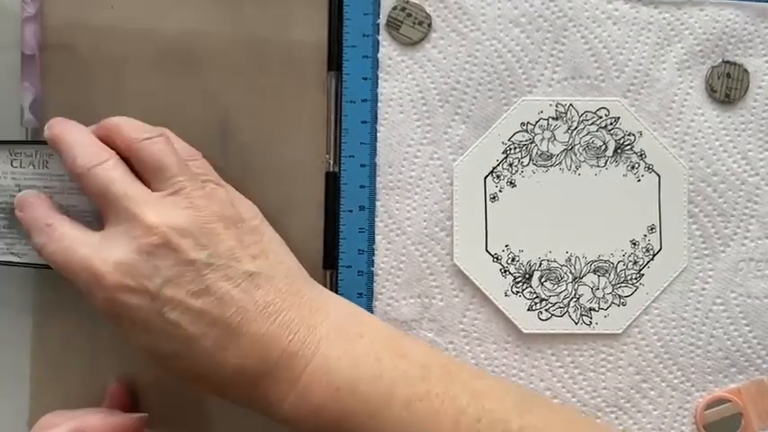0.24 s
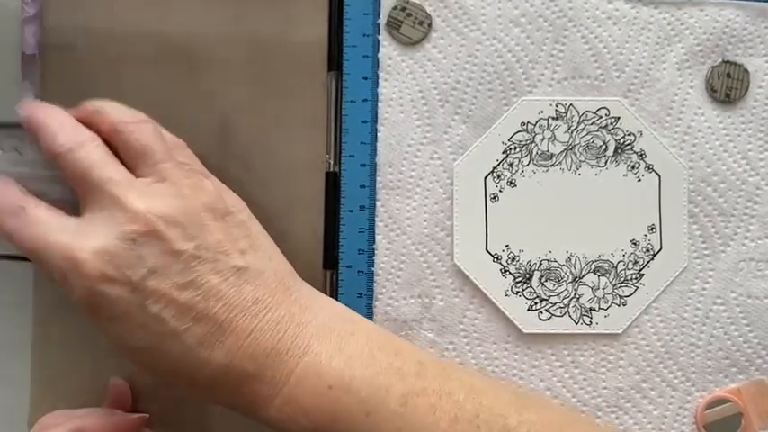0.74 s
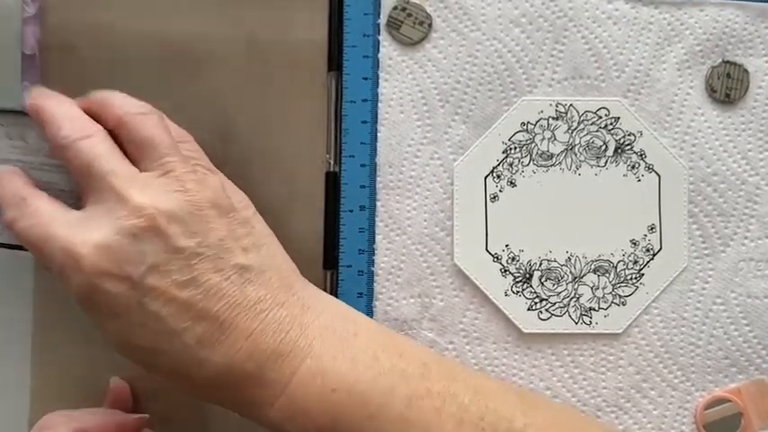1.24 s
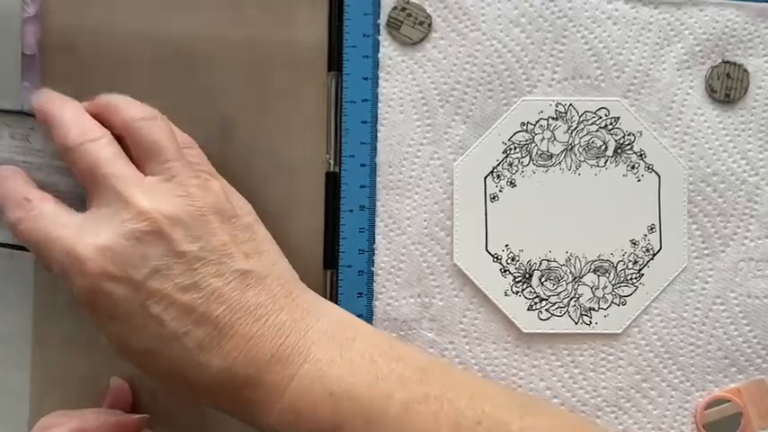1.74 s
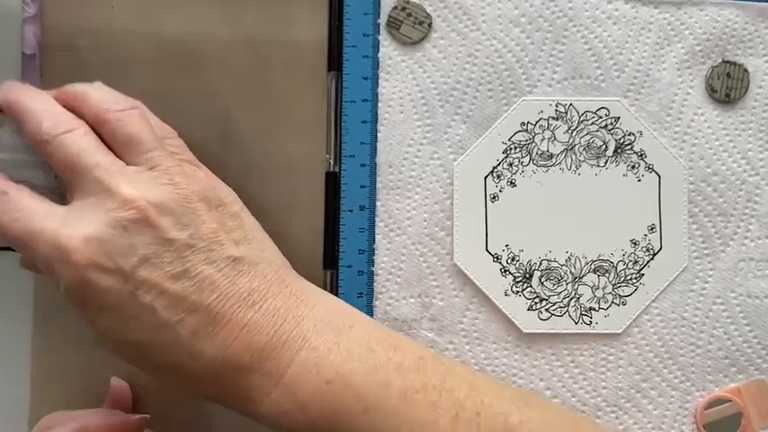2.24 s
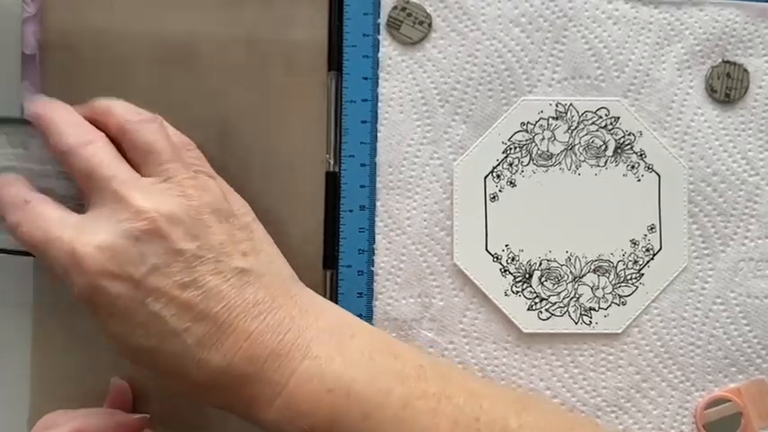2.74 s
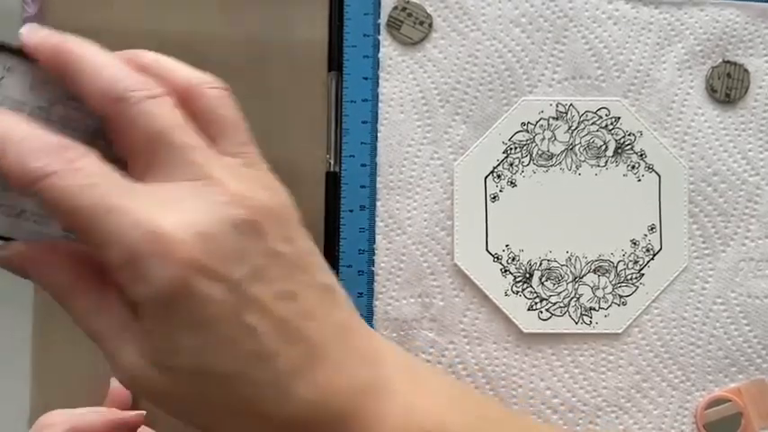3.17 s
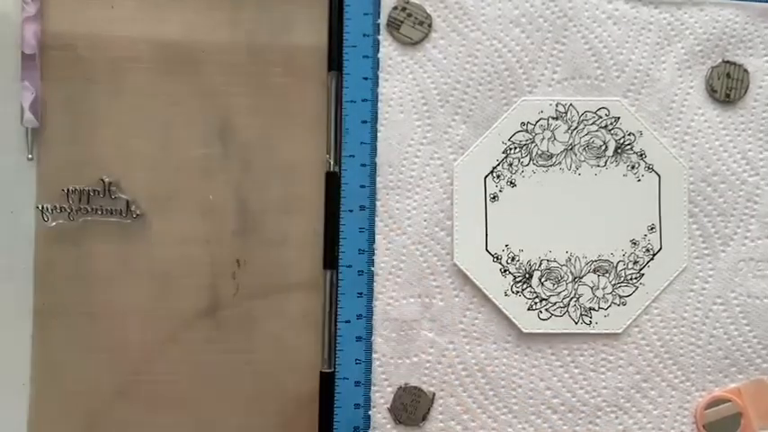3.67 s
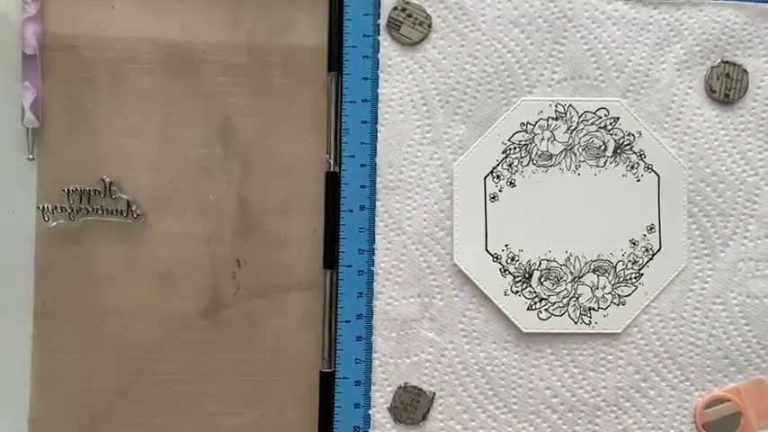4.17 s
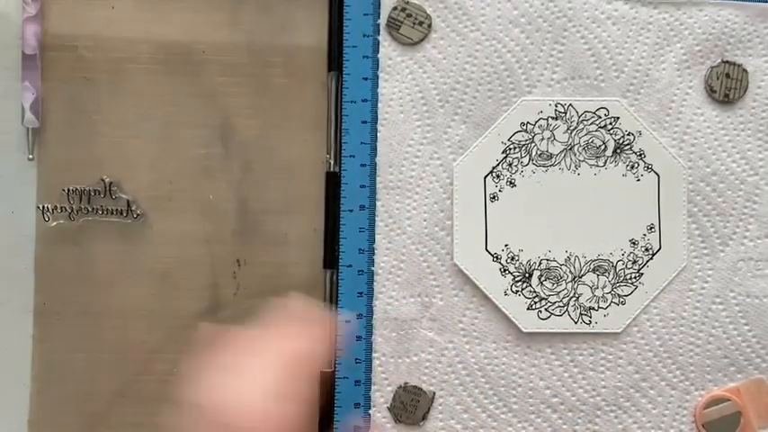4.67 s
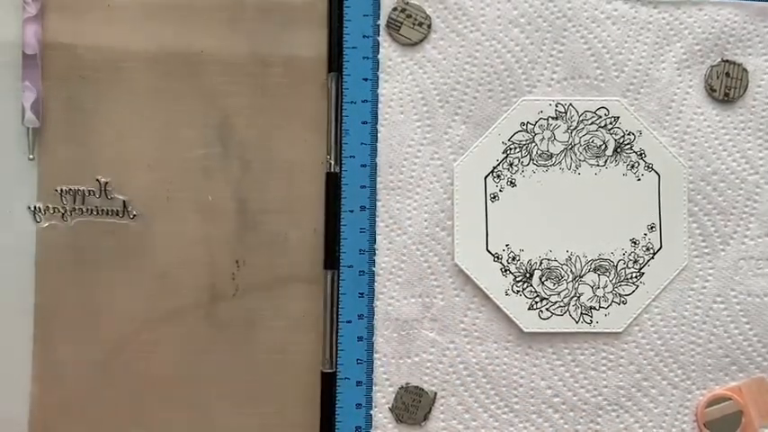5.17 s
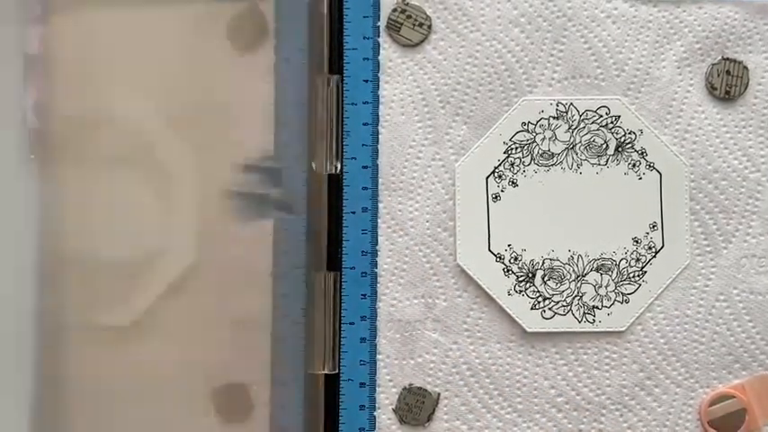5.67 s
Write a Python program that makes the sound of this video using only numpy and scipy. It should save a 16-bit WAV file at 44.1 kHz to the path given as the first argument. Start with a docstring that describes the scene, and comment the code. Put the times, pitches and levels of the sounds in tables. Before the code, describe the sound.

Soft paired taps on a desk and light plastic snaps, followed by two loud thunks and a brief shudder from a stamp press.

```python
"""An ink pad is tapped in six pairs on a rubber stamp, on a desk in a small room.
Its plastic lid is snapped on and it is put down. Then the hinged plate of a stamp press is lifted
with two loud thunks, and shudders and groans as it swings over. Blows reach the microphone as
dispersive bending waves in the desk, treble first and bass last. Fingers brush over plastic;
a faint drone swells twice at the start, over the hush of the room."""
import sys
import numpy as np
from scipy import signal
from scipy.fft import rfft, irfft
from scipy.io import wavfile
from scipy.ndimage import uniform_filter1d

SR = 44100
rng = np.random.default_rng(int(sys.argv[2]) if len(sys.argv) > 2 else 0)


def dump(signal):
    """Clip the signal to [-1, 1] and save it as 16-bit WAV at the path in sys.argv[1]."""
    limited = np.clip(np.atleast_2d(signal).T, -1, 1)
    pcm = np.round(limited * 32767).astype(np.int16)
    wavfile.write(sys.argv[1], SR, pcm)


N = 260631
SIZE = 32768  # samples in one blow
HZ, T = np.fft.rfftfreq(SIZE, 1 / SR), np.arange(SIZE) / SR

# blows on the press plate: start_s, level_db, tilt_db_per_octave, crack_db, contact_hz, contact_db
PLATE_KNOCKS = [(4.8842, -18.5, 0, -41, 2180, 4.5), (5.149, -14, 0, -25.5, 765, 2),
                (5.175, -27, -1, -68.5, 800, -2.5)]
# modes of the press plate on the desk: pitch_hz, width_hz, lift_db
PLATE_MODES = [(145, 14, 10.5), (237, 90, 5.5), (303, 69, 9.5), (387.7, 56, 15.5), (479, 47, 11.5),
               (664, 80, 7), (733, 60, 10), (804, 30, 4), (906, 20, -4), (1020, 170, 5.5), (1387, 55, 8),
               (1820, 110, 3), (1974, 50, 7.5), (2200, 240, 1.5), (3430, 73, 4)]


def pad_taps(usual_db=-33):
    """Impacts at one spot share one response of the desk; harder ones gain treble and bass weight."""
    # pad on stamp: start_s, relative_level_db
    taps = [(0.2661, -27), (0.48, -34.5), (0.8394, -31), (1.0413, -37.5), (1.349, -27.5), (1.538, -42),
            (1.8472, -30.5), (2.043, -36), (2.3733, -31), (2.5525, -38), (2.841, -29.5), (3.026, -32)]
    # spectral envelope of a tap: frequency_hz, gain_db
    tap_colour = [(40, -7), (60, 8), (100, 13.5), (200, 5), (280, 6.5), (380, 3.5), (700, 3), (1000, 4),
                  (1800, 3), (2300, 4), (3000, -2), (4000, -12), (6000, -15.5), (7000, -20.5), (11500, -24),
                  (16000, -43)]
    # modes of the desk: pitch_hz, width_hz, unscaled_lift_db
    desk_modes = [(68, 18, 7.5), (94.8, 30.6, 11.5), (123.8, 17, 10.5), (162.4, 20, 3), (182.8, 24, 11),
                  (246.7, 46, 12.5), (305, 68, 10), (394, 21, 9.5), (465, 17, 2.5), (585, 61, 17),
                  (622, 14, 5.5), (636, 15, 3.5), (749, 26, 7.5), (1139, 46, 8), (1360, 22, -2),
                  (1917, 55, 4.5)]
    colour = causal(read(tap_colour, HZ) + 0.78 * resonances(desk_modes))
    low, high = crossover(corner_hz=717)
    # the case clacks at once; the thud crosses the desk and comes back from its edges
    rattle = amp(-22.5) + amp(-2) * scatter(t60=0.04, rise_s=0.0027)
    rattle += amp(-7.5) * scatter(t60=0.22, rise_s=0.0069)
    clack = bending(lag_s=0.001985, fast_hz=9900) * rattle
    desk_ring = amp(-6.5) + amp(-1.5) * scatter(t60=0.1) + amp(-7) * scatter(t60=0.15)
    thud = bending(lag_s=0.009, fast_hz=3118) * desk_ring
    echo = amp(-8.5) * low * scatter(t60=0.043) * delay(0.023)
    colour_per_db = tilt(db_per_octave=0.1868) + 0.94 * hump(hz=140, octaves=1.56)
    out = np.zeros(N)
    for start_s, db in taps:
        # one edge touches first, then the pad slaps flat, never quite the same twice
        slap = amp(-8) * scatter(t60=0.2) * delay(0.009 * rng.uniform(0.8, 1.2))
        wave = low * thud + high * clack + slap + echo
        add_blow(out, start_s, db, colour * wave * causal((db - usual_db) * colour_per_db))
    return out


def pad_case(contact_db=9):
    """A thin plastic shell, snapped or brushed, rings in its modes; the contact point favours one band."""
    # snaps of the pad's case and two faint, quick finger brushes on it:
    # start_s, relative_level_db, contact_hz, treble_corner_hz, t60_s
    contacts = [(3.373, -60, 345, 4470, 0.04), (3.709, -45, 1750, 4470, 0.081),
                (3.788, -57.5, 1340, 2640, 0.022), (3.8374, -39.5, 1810, 8200, 0.088),
                (3.88, -44.5, 1210, 2700, 0.05), (3.9391, -28, 990, 10000, 0.027),
                (4.136, -55.5, 2220, 10800, 0.22), (4.257, -61.5, 1030, 11200, 0.18),
                (4.425, -45.5, 950, 6000, 0.034), (4.4355, -32, 683, 5730, 0.04),
                (4.8032, -57, 1807, 5600, 0.0081)]
    # spectral envelope of the case: frequency_hz, gain_db
    case_colour = [(60, -17), (200, -11.5), (320, -4), (700, -1), (1500, -3), (2700, -6.5), (4000, -9.5),
                   (5600, -10), (6700, -10.5), (9000, -9), (13000, -5), (16000, -17.5)]
    # modes of the case: pitch_hz, width_hz, lift_db
    case_modes = [(520, 94, 1), (874, 79, 4.5), (1150, 180, 3), (1730, 100, 7.5), (2180, 200, 6),
                  (2900, 200, 5.5), (3770, 780, 7), (5110, 170, 6.5), (7740, 1000, 3)]
    shell_db = read(case_colour, HZ) + resonances(case_modes)
    out = np.zeros(N)
    for start_s, db, contact_hz, corner_hz, t60 in contacts:
        treble_loss_db = 10 * np.log10(1 + (HZ / corner_hz) ** 8)
        bass_loss_db = 10 * np.log10(1 + (0.36 * contact_hz / (HZ + 1)) ** 2)
        colour = causal(shell_db + contact_db * hump(contact_hz, 0.38) - treble_loss_db - bass_loss_db)
        wave = 1 + amp(-3) * scatter(t60=0.0053) + amp(4) * scatter(t60)
        add_blow(out, start_s, db, colour * wave)
    return out


def press_plate(bumps=7):
    """Two paths: each knock sends a crack through the air and a thunk through the desk, with its echo."""
    # spectral envelope of a thunk: frequency_hz, gain_db
    thunk_colour = [(40, -27.5), (90, -8.5), (150, -8), (250, 2.5), (450, 1), (650, 4.5), (880, -2),
                    (1400, -5.5), (2000, -10.5), (3000, -17.5), (5300, -26.5), (7000, -30), (10000, -36.5),
                    (16000, -43)]
    # spectral envelope of a crack: frequency_hz, gain_db
    crack_colour = [(500, -13), (2000, -3), (3500, -4), (5200, 6.5), (6000, -0.5), (6900, -14),
                    (9200, -0.5), (12000, -12), (16000, -24.5)]
    colour = causal(read(thunk_colour, HZ) + resonances(PLATE_MODES))
    low, high = crossover(corner_hz=1260)
    travel = bending(lag_s=0.008, fast_hz=1115)
    crack = causal(read(crack_colour, HZ)) * bending(lag_s=0.00124, fast_hz=13600)

    def thunk(db_per_octave, contact_hz, contact_db):
        """One blow and its reflection from the desk's edge, coloured by the point of contact."""
        echo = amp(-5) * scatter(t60=0.054) * delay(0.0097)
        clatter = amp(-2.5) + amp(11) * scatter(t60=0.063)
        contact = causal(tilt(db_per_octave) + contact_db * hump(contact_hz, 0.38))
        return colour * (low * travel + high * clatter + echo) * contact

    out = np.zeros(N)
    for start_s, db, db_per_octave, crack_db, contact_hz, contact_db in PLATE_KNOCKS:
        add_blow(out, start_s, db, thunk(db_per_octave, contact_hz, contact_db))
        add_blow(out, start_s, crack_db, crack)
    # the freed plate rocks on its hinge and bumps once a cycle, ever more softly
    rock_start_s, period_s, first_db, fade_db_per_s = 5.222, 0.062, -35.5, 71
    for age in period_s * np.arange(bumps):
        bump = thunk(db_per_octave=-5.5, contact_hz=1410, contact_db=2.5)
        add_blow(out, rock_start_s + age, first_db - fade_db_per_s * age, bump)
    return out


def hinge(slips_per_s=2500, groan_width_hz=180, groan_lift_db=20):
    """Stick-slip friction shakes the plate: thinly while the hinge rubs, in a groan where it binds."""
    # spectral envelope of the shaking plate: frequency_hz, gain_db
    shudder_colour = [(100, -14), (230, 0), (400, -4.5), (700, -4.5), (1000, -9), (1600, -11.5),
                      (3000, -25.5), (5500, -33.5), (8000, -44.5), (15000, -47.5)]
    # rubbing as the plate is pushed and raised: start_s, length_s, level_db
    rubs = [(4.866, 0.037, -50), (5.01, .14, -42)]
    # hollow groans: start_s, length_s, level_db, pitch_hz
    groans = [(4.961, 0.011, -41.5, 726), (5.018, .05, -34.5, 724), (5.124, 0.034, -31.5, 750)]
    slips = rng.standard_normal(N) * (rng.random(N) < slips_per_s / SR)
    colour_db = read(shudder_colour, HZ)
    body = causal(colour_db + resonances(PLATE_MODES))
    _, thin = crossover(corner_hz=478)
    out = shudder() * unit_rms(signal.fftconvolve(slips, irfft(body))[:N])
    out += swells(rubs) * unit_rms(signal.fftconvolve(slips, irfft(body * thin))[:N])
    for start_s, length_s, db, hz in groans:
        stroke = rng.standard_normal(SIZE) * np.clip(1 - T / length_s, 0, 1) ** 0.5
        hollow = causal(colour_db + resonances([(hz, groan_width_hz, groan_lift_db)]))
        add_blow(out, start_s, db, rfft(stroke) * hollow)
    return out


def shudder(below_knock_db=22.5, rise_s=0.018, fade_db_per_s=67):
    """Envelope of the plate's damped vibration: each knock sets it off, and their powers add."""
    power = 0
    for start_s, db, *_ in PLATE_KNOCKS:
        age = np.maximum(np.arange(N) / SR - start_s, 0)
        build_up = np.minimum(age / rise_s, 1)
        power += (build_up * amp(db - below_knock_db - fade_db_per_s * age)) ** 2
    return np.sqrt(power)


def fingers(grains_per_s=700):
    """Sliding friction: skin catches and slips on plastic, a hiss with small grains in it."""
    # strokes of the fingers: start_s, length_s, level_db
    brushes = [(3.83, 0.16, -64), (3.95, 0.23, -67), (4.26, 0.15, -75), (4.39, .18, -60.5),
               (4.565, 0.046, -58.5), (4.57, 0.098, -65.5), (4.77, 0.21, -68.5), (4.89, 0.13, -64.5),
               (4.98, 0.39, -64)]
    # spectrum of the rustle: frequency_hz, gain_db
    rustle_colour = [(500, -17), (2000, -3.5), (3000, 5.5), (5500, 1), (9000, -3.5), (13000, -8.5),
                     (16000, -14.5)]
    grains = rng.exponential(1, N) * (rng.random(N) < grains_per_s / SR)
    catches = unit_rms(np.convolve(grains, signal.windows.hann(40), "same"))
    return swells(brushes) * unit_rms(coloured_noise(rustle_colour) * (1 + amp(-9) * catches))


def drone():
    """Superposed low sine tones swell and fade faintly under one envelope."""
    # partials: pitch_hz, relative_level_db
    tones = [(52, 1), (65, 2), (238, -2.5), (289, -6.5)]
    # arches of the envelope: start_s, length_s, level_db
    arches = [(-.16, 0.28, -56.5), (.32, 0.66, -53)]
    t = np.arange(N) / SR
    chord = sum(amp(db) * np.sin(2 * np.pi * (hz * t + rng.random())) for hz, db in tones)
    return swells(arches) * unit_rms(chord)


def room_hush():
    """Ambient noise: a dull broadband hush whose level drifts slightly."""
    # spectrum of the hush: frequency_hz, gain_db
    hush_colour = [(18, -33), (30, -9), (59, -2.5), (394, -6.5), (569, -6.5), (1540, -13), (1670, -9.5),
                   (1860, -20.5), (2060, -15), (2610, -27.5), (3870, -30), (4420, -35.5), (4910, -32.5),
                   (16000, -40.5)]
    # course of its level: time_s, level_db
    hush_levels = [(3.3, -66), (4.4, -68.5), (5.9, -67.5)]
    level_db = np.interp(np.arange(N) / SR, *np.transpose(hush_levels))
    return amp(level_db) * coloured_noise(hush_colour)


def reverberation(x, first_reflection_s=0.0098):
    """The diffuse field of a small room decays exponentially, each band at its own rate."""
    # reverberation time: frequency_hz, t60_s
    decay_times = [(100, 0.93), (400, 0.27), (1500, 0.26), (5000, 0.27), (12000, 0.19)]
    # level of the tail against its input: frequency_hz, gain_db
    tail_colour = [(100, -13.5), (400, -9.5), (1200, -6.5), (3000, -5.5), (5700, 0), (6600, -7.5),
                   (14000, -10)]
    hz, t, bands = signal.stft(rng.standard_normal(SIZE), SR, nperseg=256)
    t60 = read(decay_times, hz)[:, None]
    decay = amp(read(tail_colour, hz)[:, None] - 60 * t / t60)
    unit_energy = np.sqrt(2 * np.log(1000) / (t60 * SR))
    _, tail = signal.istft(bands * decay * unit_energy, SR, nperseg=256)
    return signal.fftconvolve(x, tail[:SIZE] * (T > first_reflection_s))[:N]


def bending(lag_s, fast_hz):
    """Dispersion: speed grows as the root of frequency; the group delay is lag_s times (sqrt(1000/f) -
    sqrt(1000/fast_hz)), so lag_s is a scale in seconds, not the travel time at 1 kHz."""
    slowness = np.sqrt(1000 / np.maximum(HZ, 40))
    group_delay_s = lag_s * np.maximum(slowness - np.sqrt(1000 / fast_hz), 0)  # after fast_hz arrives
    return np.exp(-2j * np.pi * np.cumsum(group_delay_s) * HZ[1])


def scatter(t60, rise_s=0.00034):
    """Spectrum of dense reflections in a solid: noise that builds and dies, with even energy per band."""
    spectrum = rfft(rng.standard_normal(SIZE) * amp(-60 * T / t60) * (1 - np.exp(-T / rise_s)))
    whitened = spectrum / np.sqrt(uniform_filter1d(abs(spectrum) ** 2, 120))
    return rfft(irfft(whitened) * (T < T[-1] / 2))


def resonances(modes):
    """Lorentzian peaks in dB; in a causal filter each one rings."""
    return sum(db / (1 + (2 * (HZ - hz) / width) ** 2) for hz, width, db in modes)


def causal(db):
    """Minimum phase: the spectrum of the quickest pulse with this colour."""
    log_gain = np.log(amp(np.maximum(db, -100)))
    mirrored = np.r_[log_gain, log_gain[-2:0:-1]]
    return np.exp(np.conj(signal.hilbert(mirrored)))[:len(HZ)]


def crossover(corner_hz):
    """Causal low and high parts whose powers sum to one."""
    ratio = ((HZ + 1) / corner_hz) ** 4
    return causal(-10 * np.log10(1 + ratio)), causal(-10 * np.log10(1 + 1 / ratio))


def delay(seconds):
    """A pure delay is a linear phase."""
    return np.exp(-2j * np.pi * HZ * seconds)


def hump(hz, octaves):
    """A Gaussian of height 1 in log frequency."""
    return np.exp(-0.5 * (np.log2((HZ + 1) / hz) / octaves) ** 2)


def tilt(db_per_octave):
    """Spectral slope in dB, turning about 700 Hz."""
    return db_per_octave * np.log2(np.maximum(HZ, 100) / 700)


def add_blow(mix, start_s, db, spectrum):
    """Superposes one blow, its far end faded; db is its rms as if all its energy fell in 30 ms."""
    fade = np.clip(3 - 4 * T / T[-1], 0, 1)
    sound = amp(db) * irfft(unit_rms(spectrum)) * np.sqrt(0.03 * SR) * fade
    part = mix[round(start_s * SR):][:SIZE]
    part += sound[:len(part)]


def swells(rows):
    """An envelope of half-sine arches."""
    t = np.arange(N) / SR
    return sum(amp(db) * np.sin(np.pi * np.clip((t - start) / length, 0, 1)) for start, length, db in rows)


def coloured_noise(colour):
    """Spectrally shaped noise of rms 1."""
    gain = amp(read(colour, np.fft.rfftfreq(N, 1 / SR)))
    return unit_rms(irfft(rfft(rng.standard_normal(N)) * gain, N))


def read(points, hz):
    """Interpolates rows of frequency_hz, value in log frequency."""
    point_hz, value = np.transpose(points)
    return np.interp(np.log(hz + 1), np.log(point_hz + 1), value)


def unit_rms(x):
    """Scales to rms 1."""
    return x / np.sqrt(np.mean(abs(x) ** 2) + 1e-20)


def amp(db):
    """Decibels to gain."""
    return 10 ** (np.asarray(db) / 20)


def scene():
    """Direct-to-reverberant ratio: desk-borne blows are close and dry; the case, further off, is wetter."""
    pad, case, press = pad_taps(), pad_case(), press_plate() + hinge()
    direct = amp(0.5) * pad + amp(-2.5) * case + press
    diffuse = reverberation(amp(-2) * pad + amp(1) * case + amp(-7) * press)
    return (direct + diffuse + fingers() + drone() + room_hush())[None]


def record(dry, bass_corner_hz=48, edge_hz=16000):
    """Band limiting: the microphone drops the deep bass, and a steep low-pass the top treble."""
    high_pass = signal.butter(4, bass_corner_hz, "highpass", fs=SR, output="sos")
    low_pass = signal.firwin(511, edge_hz, window=("kaiser", 9), fs=SR)
    return signal.oaconvolve(signal.sosfilt(high_pass, dry), low_pass[None], "same")


dry = scene()
out = record(dry)
dump(out)
```